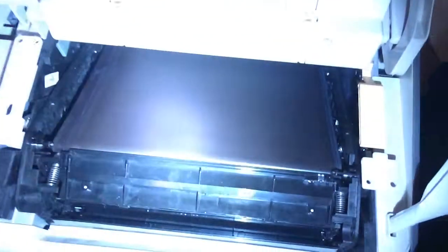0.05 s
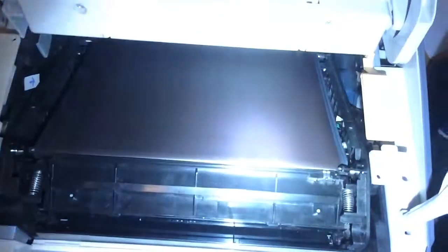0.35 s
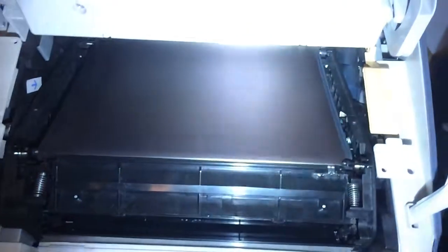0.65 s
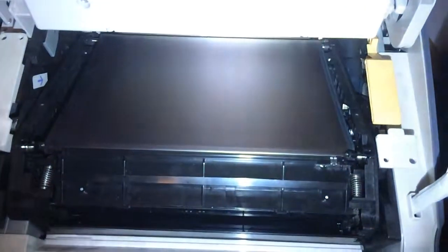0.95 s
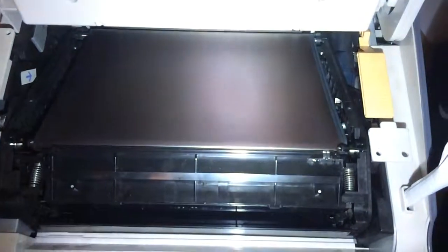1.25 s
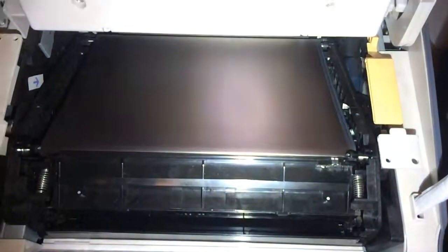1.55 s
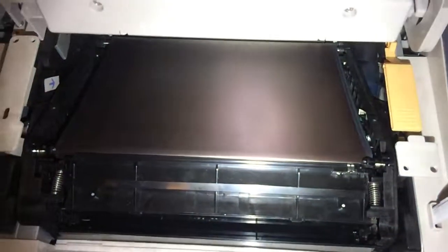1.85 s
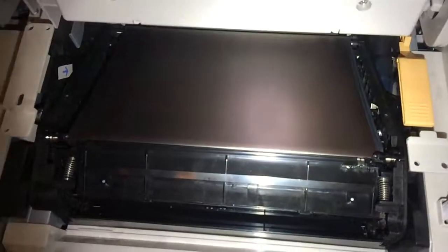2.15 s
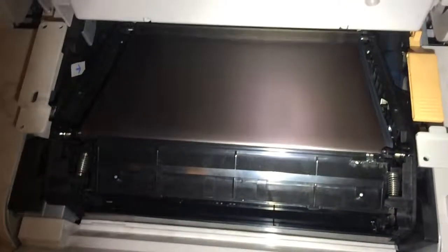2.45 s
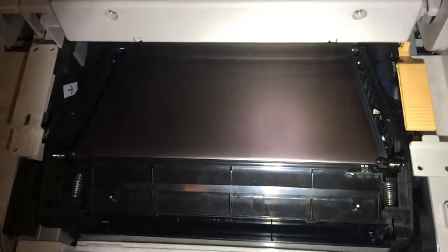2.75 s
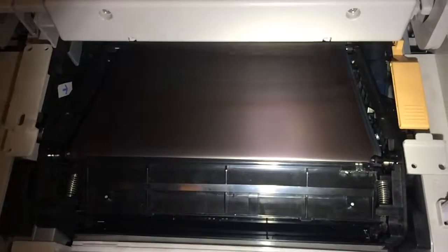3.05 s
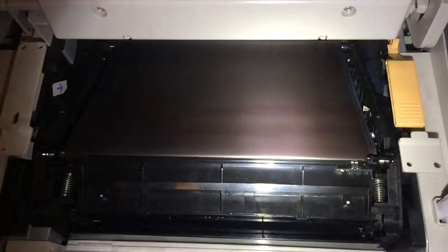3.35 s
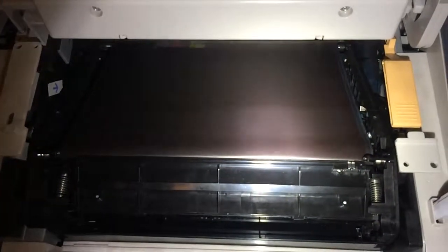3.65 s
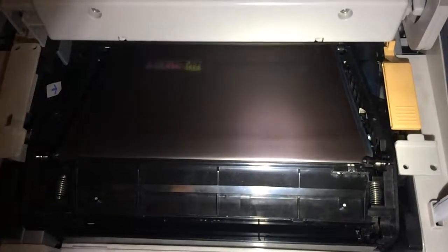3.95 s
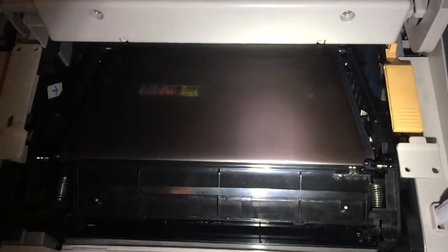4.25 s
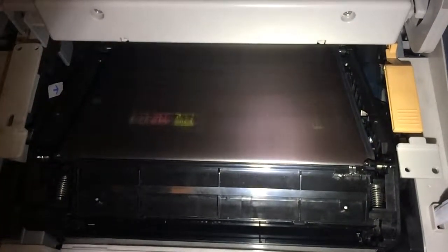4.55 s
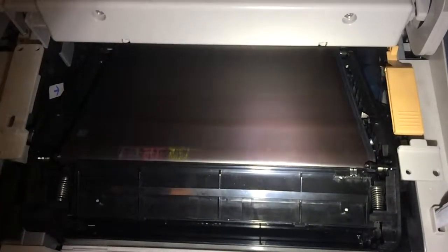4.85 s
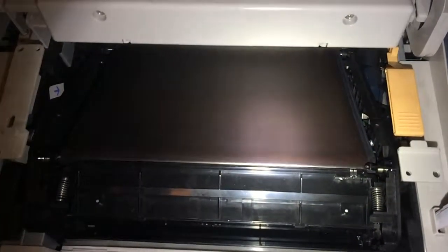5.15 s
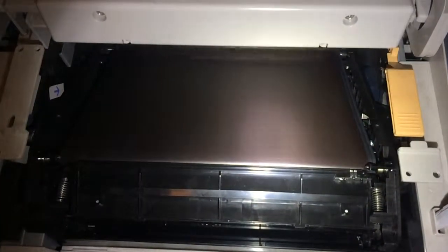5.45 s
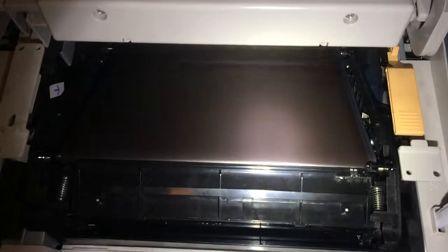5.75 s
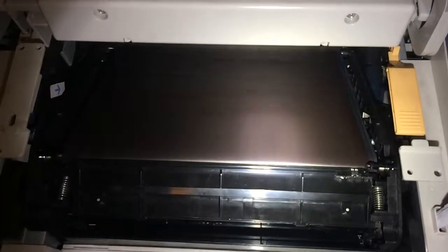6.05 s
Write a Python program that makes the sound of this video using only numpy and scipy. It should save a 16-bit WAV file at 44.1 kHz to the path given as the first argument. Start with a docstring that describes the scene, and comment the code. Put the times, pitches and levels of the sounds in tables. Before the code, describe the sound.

After a soft rustle and a button click, a printer jolts into motion, whirring and whining with sharp plastic clacks.

```python
"""Just above the transfer belt of an open laser printer, one microphone close in, a quiet room behind.
A hand rustles, taps lightly and clicks a button. A relay snaps and leaves the metal frame ringing,
then the drive jolts into motion: gear teeth whir in their housing, the belt hisses as it slides and
rollers shake the chassis. One motor sweeps upward while the main stepper sets in with a throbbing
whine. Clutches clack in and out, plastic parts rub, and the fans come up to speed."""
import sys
import numpy as np
from scipy.fft import rfft, irfft, next_fast_len
from scipy.io import wavfile
from scipy.ndimage import uniform_filter1d, map_coordinates

SR = 44100
rng = np.random.default_rng(int(sys.argv[2]) if len(sys.argv) > 2 else 0)


def digitize_waveform(pressure):
    """Quantize a signal to 16-bit integers and store it at the path in sys.argv[1].

    Rows of a 2-D input are taken as channels; values are limited to [-1, 1].
    """
    field = np.atleast_2d(pressure).T
    bounded = np.clip(field, -1, 1)
    quanta = np.round(bounded * 32767).astype(np.int16)
    wavfile.write(sys.argv[1], SR, quanta)


N = 269010
DRIVE_START_S = 2.344

# The room's murmur behind the printer. Each row: frequency in Hz, relative level in dB.
ROOM_SPECTRUM = [(12, -39), (20, -22), (49, -8.5), (89, -3.5), (124, -11.5), (147, -11.5), (205, -7.5),
                 (270, -18.5), (525, -21), (1080, -27.5), (1350, -26), (1680, -30), (15000, -35)]
# The rustle of a sleeve. Each row: frequency in Hz, relative level in dB.
SLEEVE_SPECTRUM = [(150, -20), (250, -0.5), (397, -3.5), (641, -9.5), (1190, -6.5), (4080, -6),
                   (13000, -14.5), (15000, -21)]
# A hand slides. Each row: start in seconds, seconds until release, level in dB, rise in seconds.
HAND_STROKES = [(-.02, .12, -65.5, 0.017), (0.115, 0.26, -58.5, 0.13)]
# The switch snaps over and lands. Each row: time in seconds, strength of the impulse in dB.
BUTTON_CONTACTS = [(0.7950, -5), (0.7980, -6)]
# Resonances of the plastic key. Each row: frequency in Hz, width in Hz, gain in dB.
BUTTON_MODES = [(1220, 140, -2), (1580, 160, 0), (2370, 160, -1), (3100, 110, -0.5), (3520, 170, 2),
                (4060, 390, -6), (8500, 460, -4), (10600, 1500, -15), (13500, 1500, -21)]
# The relay's spring and bracket. Each row: frequency in Hz, level in dB, t60 in seconds.
RELAY_MODES = [(1000, -62, .5), (2520, -61, .7), (4040, -66, 1.8), (12100, -79, 1.5), (12450, -80, 1.5)]
# The metal frame's long ring. Each row: frequency in Hz, relative level in dB.
FRAME_SPECTRUM = [(70, -11), (170, 3.5), (900, 6.5), (2500, -2), (3600, -12), (6000, -17), (9000, -30)]
# Tones of fans and gear meshes. Each row: frequency in Hz, level in dB, time when up to speed in
# seconds, waver in Hz.
FAN_TONES = [(102.3, -53, 3.7, 2), (153, -57, 3.6, 2), (184, -56, 2.4, 2), (341, -54, 4.5, 1.5),
             (594, -53, 4.5, .8), (683, -58, 4.6, 1.5), (747, -61, 3.7, 1.5), (783, -63, 2.4, 2),
             (942, -60, 2.4, 3), (996, -58, 2.4, 3), (1024, -57, 4.5, 2), (1120, -56, 3.7, 2),
             (1366, -56.5, 4.95, 5), (1492, -62, 3.7, 2), (3786, -66, 4.4, 2), (3993, -56.5, 5.1, 1),
             (7574, -62, 4.3, 1.5)]
# Parts that rub in passing. Each row: peak time in seconds, band centre in Hz, level in dB,
# half length in seconds.
PLASTIC_RUBS = [(1.15, 1400, -75, .05), (1.319, 1330, -78, .05), (2.976, 3000, -44.5, 0.0089),
                (3.273, 6340, -46, .015), (3.317, 3380, -41.5, 0.0093), (3.918, 9000, -46, .03),
                (4.10, 9600, -47.5, 0.033), (4.491, 9600, -46, 0.034), (4.679, 3330, -47, 0.033),
                (5.55, 8600, -51, 0.034)]
# The shaking chassis. Each row: frequency in Hz, relative level in dB.
RUMBLE_SPECTRUM = [(20, -17), (45, -11), (72, 0), (105, 3), (130, -7), (160, -0.5), (190, 7), (240, -6),
                   (400, -20.5)]
# The belt's hiss, right under the microphone. Each row: frequency in Hz, relative level in dB.
BELT_SPECTRUM = [(3000, -63), (5300, -17.5), (6400, -3.5), (8700, -3), (10500, 0.5), (11050, 2.5),
                 (11600, -2.5), (13000, -0.5), (13550, -5), (14000, 4.5), (14600, -3), (15300, 1.5)]
# The belt slips most as it starts, settles, then tightens. Each row: time in seconds, hiss in dB.
BELT_SLIP = [(2.45, -35.5), (2.72, -38), (3.1, -40), (3.6, -45), (4.2, -43), (4.88, -41.5), (5.0, -40),
             (5.4, -40.5), (5.85, -39)]
# The whir of the gear train. Each row: frequency in Hz, relative level in dB.
WHIR_SPECTRUM = [(130, -18), (220, -5), (464, -4.5), (519, -2), (665, -5.5), (853, -3), (980, -1.5),
                 (1240, -9), (1370, -2.5), (2250, -8.5), (2440, -4.5), (2770, -8), (6000, -18.5),
                 (7800, -29), (13200, -120)]
# Resonances of the gear housing. Each row: frequency in Hz, width in Hz, relative level in dB.
HOUSING_MODES = [(331, 49, -3), (520, 46, -6), (952, 23, 3.5), (1000, 63, -4.5), (1080, 82, 1),
                 (2096, 43, -4.5), (2580, 69, -23)]
# Load on the gear train. Each row: time in seconds, gain of the gear noise in dB.
GEAR_LOAD = [(2.4, -38), (2.8, -40), (3.45, -38), (3.75, -41), (4.15, -42.5), (4.6, -39.5), (6.05, -40.5)]
# Panels and shafts jolted by a touch or by the mechanism. Each row: start in seconds, frequency in Hz,
# peak level in dB, swell in seconds, t60 in seconds.
JOLTS = [(0.259, 137, -46.5, 0.0083, 0.1), (0.366, 100, -48, 0.0046, 0.033),
         (0.592, 91, -52.5, 0.0091, .07), (1.833, 94, -41, 0.0049, 0.025),
         (1.832, 626, -52.5, 0.0024, 0.018), (2.088, 190, -49, 0.023, 0.13),
         (2.338, 181.6, -32.5, 0.0054, 0.29), (2.346, 510, -30, 0.011, 0.094),
         (2.921, 341, -23, 0.01, 0.048), (2.929, 402, -20.5, 0.013, 0.061), (2.923, 246, -27, 0.011, .08),
         (3.417, 333.6, -19, 0.022, 0.1), (3.43, 250, -31, 0.013, 0.067), (3.49, 68, -30.5, 0.039, 0.34),
         (3.504, 124, -28.5, 0.0092, 0.16), (4.282, 133, -39, 0.0088, 0.081),
         (4.752, 240, -31.5, 0.0068, 0.061)]
# Light handling taps, then the relay, clutches and levers. Each row: start in seconds, level in dB,
# rattle time in seconds, tilt in dB per octave, t60 of the ring in seconds, part resonance in Hz.
IMPACTS = [(0.250, -46, 0.0047, 1, 0.067, 3520), (0.646, -57, 0.0017, -2, 0.03, 1300),
           (1.064, -56.5, 0.0016, -5.5, 0.029, 720), (1.093, -62, .002, -4.5, .05, 1300),
           (1.110, -77, 0.039, -5, 0.77, 1400), (1.174, -66.5, 0.004, -2, .11, 1600),
           (2.085, -32.5, 0.0069, -1.5, 0.2, 1180), (2.345, -27.5, 0.0062, -7, 0.12, 520),
           (2.443, -42, 0.0016, 3, .03, 5200), (2.926, -28, 0.0056, 0.5, 0.43, 970),
           (3.423, -29, 0.0075, -3, .05, 394), (3.438, -27.5, 0.0049, 4, 0.039, 3400),
           (3.484, -30, 0.0072, -0.5, 0.24, 476), (3.668, -41.5, 0.0017, 4, .03, 5260),
           (3.896, -38, 0.0026, -1, 0.054, 6000), (4.284, -31, 0.0022, 2, 0.05, 4000),
           (4.293, -33, 0.0035, 1.5, 0.27, 1340), (4.753, -34, 0.0069, -0.8, 0.083, 1710)]
# The clatter of loose plastic. Each row: frequency in Hz, relative level in dB.
CLATTER_SPECTRUM = [(80, -36), (170, -5), (450, -1.5), (900, -3), (1700, -3.5), (3200, -3), (5000, -7.5),
                    (8000, -11), (11000, -16.5), (15000, -22)]
# Resonances of the second motor's mount. Each row: frequency in Hz, width in Hz, level in dB.
MOUNT_MODES = [(2010, 170, -46), (2500, 160, -44), (2890, 200, -49), (6700, 230, -46)]
# Overtones and side tones of the whine. Each row: multiple of the step rate, level in dB as the drive
# starts, drift in dB per second.
WHINE_OVERTONES = [(8 / 5, -63, .6), (2, -55, -2), (3, -57.5, .1)]
# The whine swells or dips briefly. Each row: centre in seconds, change in dB, half length in seconds.
WHINE_SURGES = [(3.325, 9.5, 0.033), (3.408, -3, .035), (3.65, 1, .1), (4.432, -6.5, 0.082),
                (5.16, -5, 0.023), (5.343, 6, 0.019), (5.88, -12, 0.016)]


def amp(db):
    """Decibels to gain."""
    return 10 ** (np.asarray(db) / 20)


def unit(x):
    """Scale to rms 1."""
    return x / np.sqrt(np.mean(x ** 2) + 1e-20)


def clock():
    """The time of every sample, in seconds."""
    return np.arange(N) / SR


def curve(points):
    """Straight lines through (seconds, value) points, one value a sample."""
    return np.interp(clock(), *np.transpose(points))


def fade_in(s, length):
    """A ramp from 0 to 1 that begins at s."""
    return np.clip((clock() - s) / length, 0, 1)


def bump(s, half_length):
    """A bell-shaped swell of height 1 centred on s."""
    return np.exp(-((clock() - s) / half_length) ** 2)


def wobble(rate):
    """A smooth random curve, rate knots a second."""
    knots = rng.standard_normal(int(N * rate / SR) + 4)
    return map_coordinates(knots, [clock() * rate], mode="nearest")


def filtered(x, response):
    """Pass x through a complex frequency response."""
    size = next_fast_len(len(x) + 8192)
    return irfft(rfft(x, size) * response(np.fft.rfftfreq(size, 1 / SR)), size)[:len(x)]


def colour(points, tilt_db=0):
    """The response through (Hz, dB) points, tilted by dB per octave."""
    f, db = np.transpose(points)
    return lambda hz: amp(np.interp(np.log(hz + 1), np.log(f + 1), db + tilt_db * np.log2(f)))


def body(modes):
    """The response of (Hz, width in Hz, dB) resonances of alternating sign."""
    return lambda f: sum((-1) ** k * amp(db) * 1j * f * width / (hz * hz - f * f + 1j * f * width)
                         for k, (hz, width, db) in enumerate(modes))


def band(hz, centre_hz, octaves):
    """A bell of height 1 on an octave scale."""
    return np.exp(-(np.log2((hz + 1) / centre_hz) / octaves) ** 2)


def noise(response, size=N):
    """Coloured noise of rms 1."""
    return unit(filtered(rng.standard_normal(size), response))


def tone(hz):
    """A sine of rms 1 that follows a frequency curve."""
    return np.sqrt(2) * np.sin(2 * np.pi * (np.cumsum(hz) / SR + rng.random()))


def add(track, s, sound):
    """Mix a sound into the track at time s."""
    part = track[max(round(s * SR), 0):][:len(sound)]
    part += sound[:len(part)]


def room_tone(murmur_db=-68.5, hum_db=-75, hum_hz=120):
    """Farthest back, the low murmur of the room and a faint mains hum."""
    murmur = amp(murmur_db) * noise(colour(ROOM_SPECTRUM))
    hum = amp(hum_db + 1.3 * wobble(9.2)) * tone(np.full(N, hum_hz))
    return murmur + hum


def hand_rustle(release_s=0.086, flutter_db=1.2):
    """A hand slides in two short, rustling strokes."""
    strokes = sum(amp(db) * fade_in(s, rise) * (1 - fade_in(s + length, release_s))
                  for s, length, db, rise in HAND_STROKES)
    return strokes * amp(flutter_db * wobble(122.3)) * noise(colour(SLEEVE_SPECTRUM))


def button(echo_db=-32, echo_t60=0.1):
    """Two sharp contacts ring a small plastic key; the room answers faintly."""
    out, t = np.zeros(N), np.arange(SR // 4) / SR
    impulse = t == 0
    for s, db in BUTTON_CONTACTS:
        echo = rng.standard_normal(len(t)) * amp(echo_db - 60 * t / echo_t60)
        add(out, s, amp(db) * (impulse + echo))
    return filtered(out, body(BUTTON_MODES))


def relay_ring(start_s=2.09, frame_db=-53, frame_t60=3.4):
    """The relay leaves its spring and the metal frame ringing for a second."""
    out, t = np.zeros(N), np.arange(SR) / SR
    spring = sum(amp(db - 60 * t / t60) * np.sin(2 * np.pi * hz * t) for hz, db, t60 in RELAY_MODES)
    frame = noise(colour(FRAME_SPECTRUM), size=len(t)) * amp(frame_db - 60 * t / frame_t60)
    add(out, start_s, spring + frame)
    return out


def fans(rise_s=0.38, flutter_db=1.04):
    """Blade and mesh tones swell as their rotors reach speed, and waver a little."""
    out = np.zeros(N)
    for hz, db, at_speed_s, waver_hz in FAN_TONES:
        gain = amp(db + flutter_db * wobble(6.4)) * fade_in(at_speed_s - rise_s, rise_s)
        out += gain * tone(hz + waver_hz * wobble(12))
    return out * fade_in(DRIVE_START_S, .006)


def scrapes(octaves=0.31):
    """Plastic rubs on plastic and briefly sings in one rough band."""
    out, t = np.zeros(N), np.arange(SR // 4) / SR
    middle = t.mean()
    for s, hz, db, half_length in PLASTIC_RUBS:
        friction = noise(lambda f: band(f, hz, octaves), size=len(t))
        swell = np.exp(-((t - middle) / half_length) ** 2)
        add(out, s - middle, amp(db) * friction * swell)
    return out


def chassis_rumble(level_db=-48, lift_db=5.5, clutch_s=2.95, rise_s=0.5, settle_s=2.5, flutter_db=.8):
    """Rollers shake the chassis, harder for a while when the clutches engage."""
    working = fade_in(clutch_s, rise_s) - fade_in(clutch_s + rise_s, settle_s)
    gain = amp(level_db + lift_db * working + flutter_db * wobble(20))
    return gain * noise(colour(RUMBLE_SPECTRUM)) * fade_in(DRIVE_START_S, .04)


def belt_hiss(flutter_db=1.16):
    """Just below the microphone, the belt hisses as it slides."""
    gain = amp(curve(BELT_SLIP) + flutter_db * wobble(18))
    return gain * noise(colour(BELT_SPECTRUM)) * fade_in(DRIVE_START_S, 0.0042)


def gears(taps_per_s=260, housing_db=-6, whir_db=-3.5, flutter_db=1.4):
    """Gear teeth tap the housing at random over a broad whir; both follow the load."""
    taps = (rng.random(N) < taps_per_s / SR) * rng.standard_normal(N)
    tooth_force = unit(taps) + 0.88 * rng.standard_normal(N)
    housing = amp(housing_db) * unit(filtered(tooth_force, body(HOUSING_MODES)))
    load = amp(curve(GEAR_LOAD) + flutter_db * wobble(24))
    whir = amp(whir_db) * noise(colour(WHIR_SPECTRUM))
    return load * (housing + whir) * fade_in(DRIVE_START_S, 0.0042)


def thumps():
    """A jolted part swings up while it is pushed, then dies away."""
    out, t = np.zeros(N), np.arange(SR // 2) / SR
    for s, hz, db, swell, t60 in JOLTS:
        swing = np.minimum(t / swell, 1) ** 2 * amp(-60 * np.maximum(t - swell, 0) / t60)
        add(out, s, amp(db) * swing * np.sin(2 * np.pi * hz * t))
    return out


def clatter(part_hz, tilt_db, size, boost_db=7, octaves=0.33):
    """The noise of loose plastic, lifted around the part's own resonance."""
    plastic = colour(CLATTER_SPECTRUM, tilt_db)
    return noise(lambda hz: plastic(hz) * amp(boost_db * band(hz, part_hz, octaves)), size)


def knocks(ring_db=-2.98, grain=0.12, dull_db_per_octave=-3):
    """Loose plastic parts rattle briefly; then the frame rings out, duller."""
    out, t = np.zeros(N), np.arange(SR // 2) / SR
    for s, db, rattle_s, tilt_db, t60, part_hz in IMPACTS:
        roughness = unit(uniform_filter1d(rng.standard_normal(len(t)), size=32))
        contacts = unit(np.exp(grain * roughness))
        burst_shape = (t / rattle_s) * np.exp(1 - t / rattle_s)
        burst = contacts * burst_shape * clatter(part_hz, tilt_db, len(t))
        ring_shape = amp(ring_db - 60 * t / t60) * (1 - np.exp(-t / rattle_s))
        ring = ring_shape * clatter(part_hz, tilt_db + dull_db_per_octave, len(t))
        add(out, s, amp(db) * (burst + ring))
    return out


def motor_run_up(from_s=2.47, until_s=2.88, start_hz=1130, hz_per_s=14400,
                 direct_db=-62, chatter_hz=60, flutter_db=3.0):
    """A second motor speeds up evenly, chattering, and flares at each resonance of its mount."""
    hz = start_hz + hz_per_s * np.clip(clock() - from_s, 0, until_s - from_s)
    mount = sum(amp(db) / (1 + (2 * (hz - centre) / width) ** 2) for centre, width, db in MOUNT_MODES)
    running = fade_in(from_s, .02) * (1 - fade_in(until_s, .02))
    gain = running * (amp(direct_db) + mount) * amp(flutter_db * wobble(70))
    return gain * tone(hz + chatter_hz * wobble(400))


def stepper(step_hz=2400, jitter_hz=3, from_s=2.58, rise_s=.11, level_db=-43.5, sag_db_per_s=1.11,
            turn_hz=4.04, turn_peak_s=2.816, flutter_db=1.5, overtone_flutter_db=2.0):
    """The main motor whines at its step rate, throbs with each shaft turn and eases as it runs in."""
    rate = step_hz + jitter_hz * wobble(60)
    running_s = np.maximum(clock() - DRIVE_START_S, 0)
    shaft_angle = 2 * np.pi * turn_hz * (clock() - turn_peak_s)
    throb_db = 1.83 * np.cos(shaft_angle) - 0.3 * np.cos(2 * shaft_angle)
    surge_db = sum(db * bump(s, half_length) for s, db, half_length in WHINE_SURGES)
    whine_db = level_db - sag_db_per_s * running_s + throb_db + surge_db + flutter_db * wobble(32)
    whine = amp(whine_db) * tone(rate)
    for order, db, drift_db_per_s in WHINE_OVERTONES:
        overtone_db = db + drift_db_per_s * running_s + overtone_flutter_db * wobble(16)
        whine += amp(overtone_db) * tone(order * rate)
    return whine * fade_in(from_s, rise_s)


def scene():
    """Everything reaches one microphone above the belt, the same in both channels."""
    drive = gears() + belt_hiss() + chassis_rumble() + stepper() + motor_run_up()
    printer = drive + fans() + knocks() + thumps() + scrapes() + relay_ring() + button()
    mono = printer + hand_rustle() + room_tone()
    return np.array([mono, mono])


def record(dry):
    """The recorder keeps nothing above its band limit."""
    top_hz, edge_hz = 15300, 200
    lowpass = lambda hz: np.clip((top_hz - hz) / edge_hz + .5, 0, 1) ** 2
    return np.array([filtered(channel, lowpass) for channel in dry])


dry = scene()
out = record(dry)
digitize_waveform(out)
```